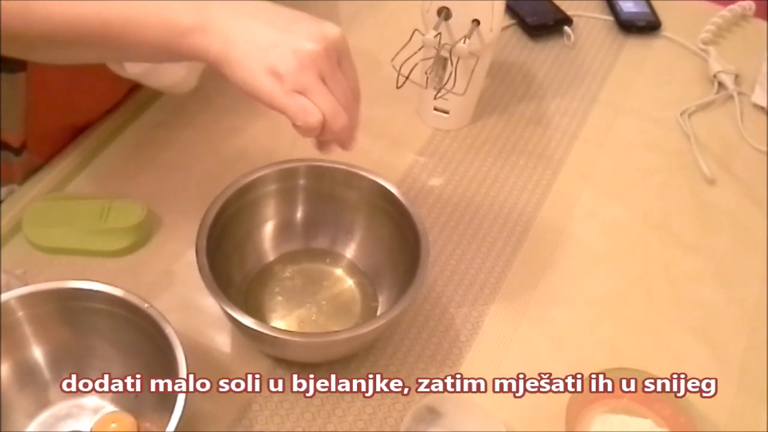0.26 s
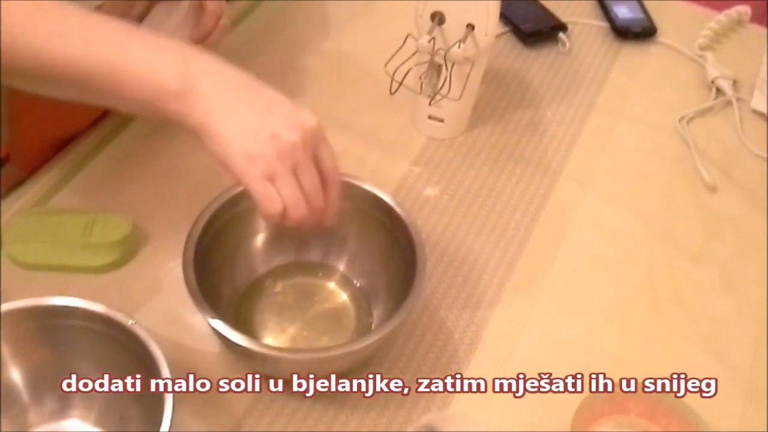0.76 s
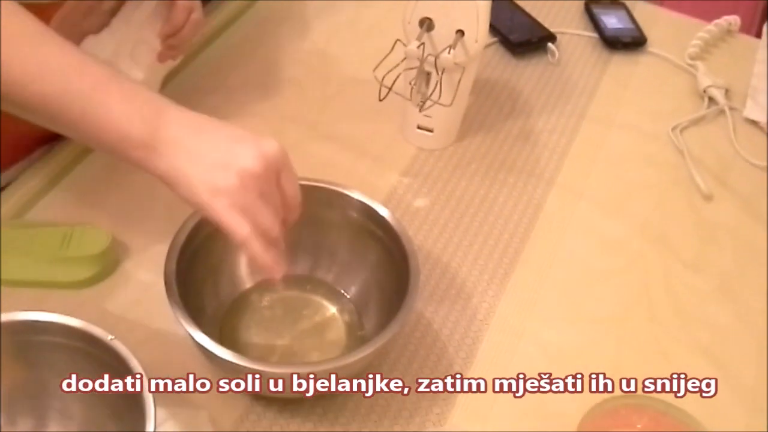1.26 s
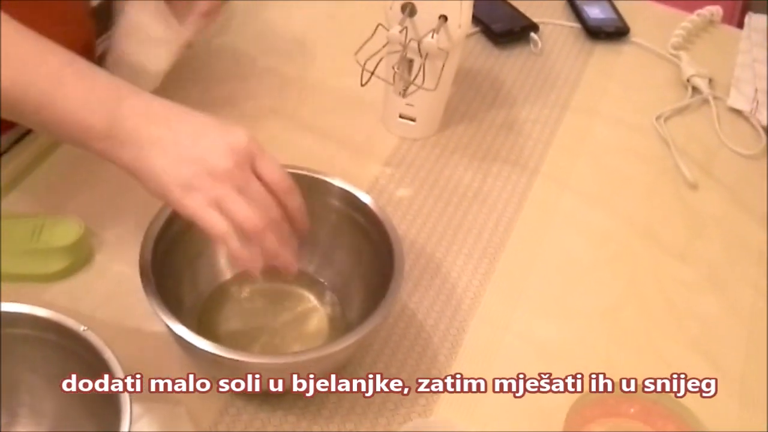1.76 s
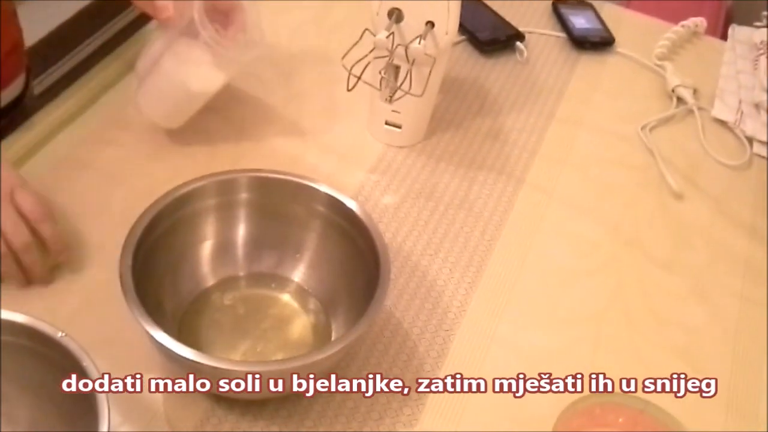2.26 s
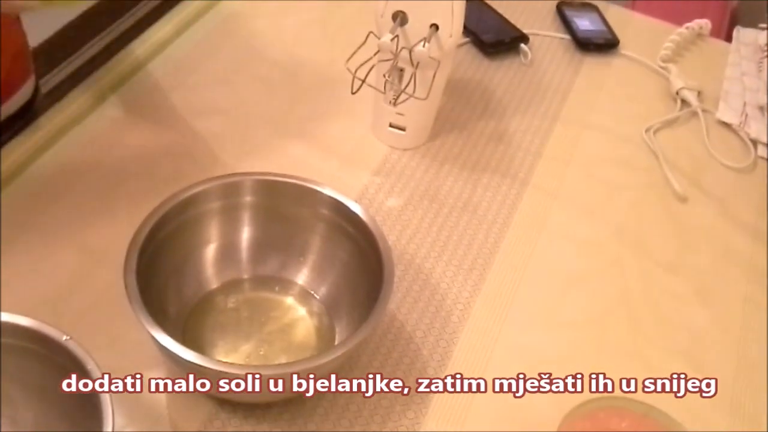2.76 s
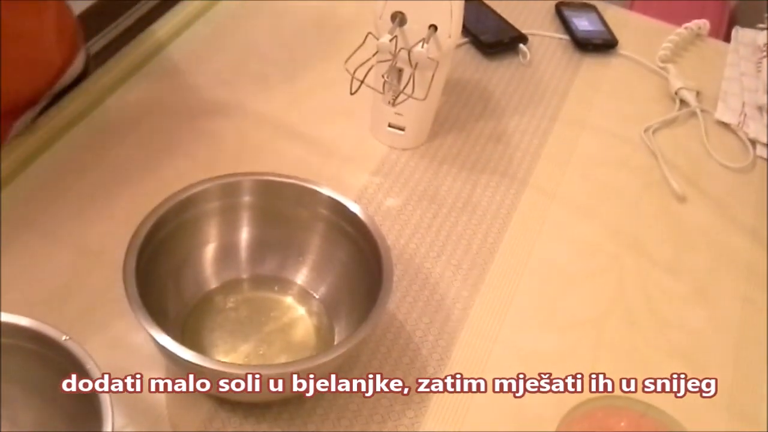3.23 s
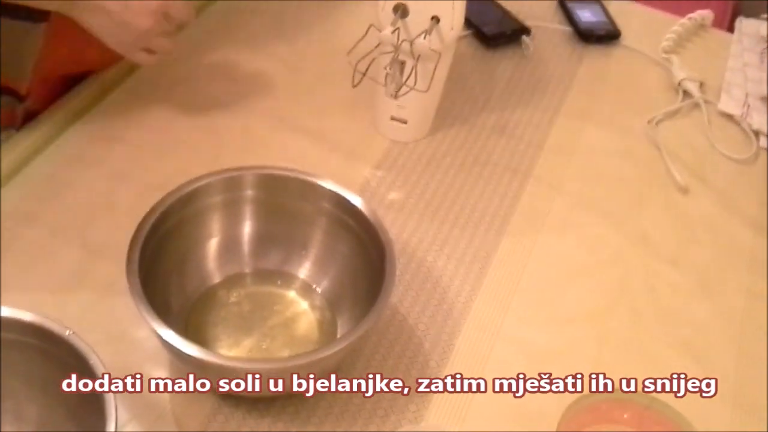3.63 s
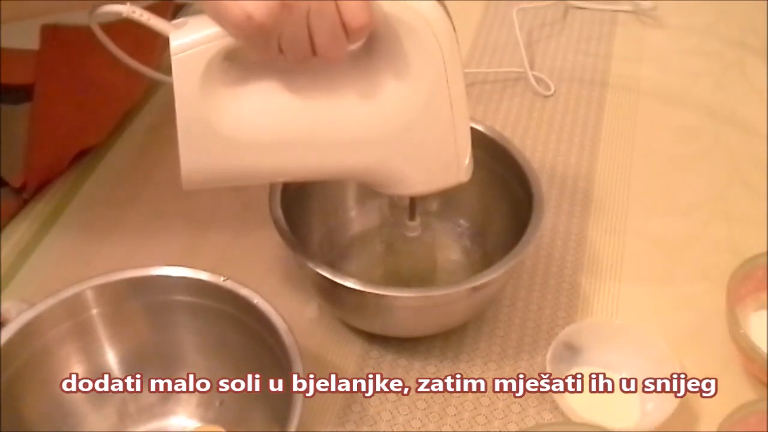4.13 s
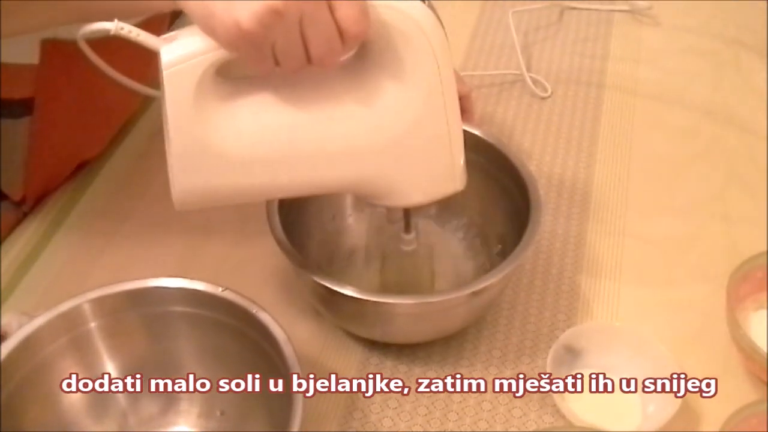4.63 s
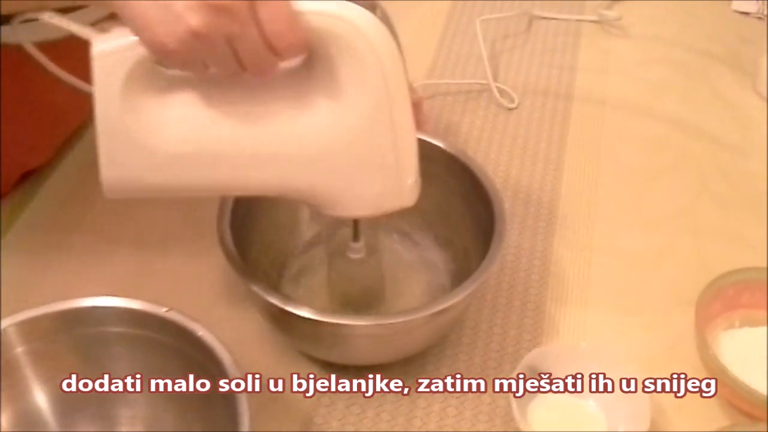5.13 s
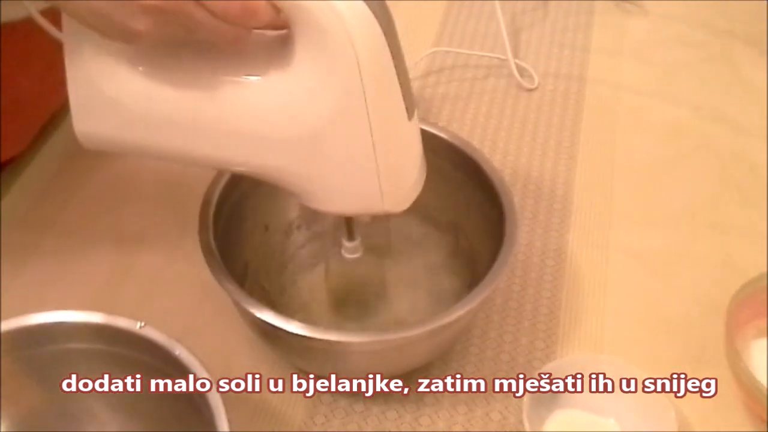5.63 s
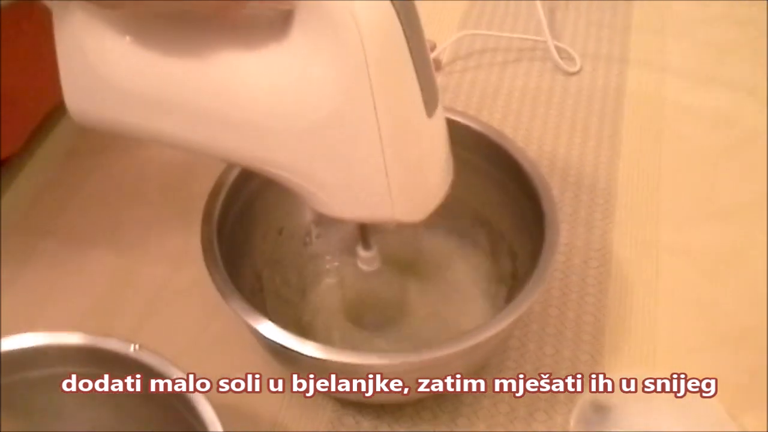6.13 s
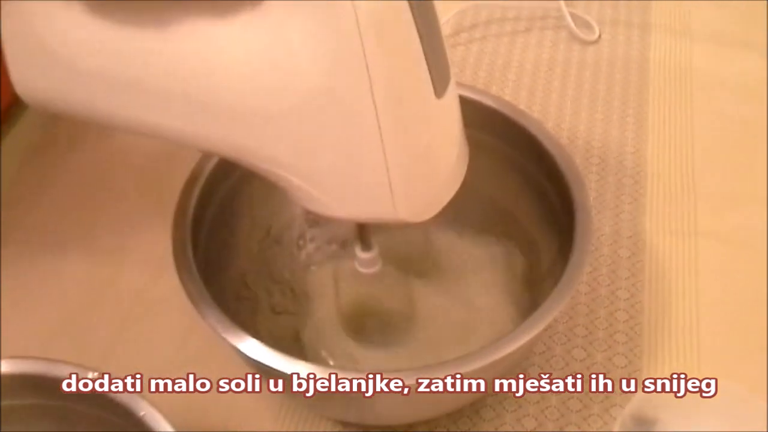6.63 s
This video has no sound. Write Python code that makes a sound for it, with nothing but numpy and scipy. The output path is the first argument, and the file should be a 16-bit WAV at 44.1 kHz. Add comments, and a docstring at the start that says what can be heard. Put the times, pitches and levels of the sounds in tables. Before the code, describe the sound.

Close plastic creaks from a hand gripping the microphone sit mostly on the left, over a faint dish clink and a soft rustle of salt between fingers. A wooden drawer slides shut with a few knocks, followed by a dull tap on the microphone. Suddenly a hand mixer is whirring in a metal bowl, loud at first, then lower. It clicks up a speed and whines higher, in a small home kitchen.

```python
"""A small kitchen, close up, on a hand-held camera; its left microphone port is covered, so that side is
dull and picks up the grip. Fingers rub salt into egg whites and a dish clinks while the camera's casing
creaks. A drawer rolls on its runners and knocks shut, and a finger taps the covered port. Then a running
hand mixer cuts in abruptly, whisking in a steel bowl, loud until the camera's automatic gain turns it
down. Its motor throbs with the mains until the switch clicks up and it spins to a higher speed."""
import sys
import numpy as np
from scipy import signal
from scipy.fft import rfft, irfft, next_fast_len
from scipy.io import wavfile
from scipy.ndimage import uniform_filter1d, map_coordinates

SR = 44100
rng = np.random.default_rng(int(sys.argv[2]) if len(sys.argv) > 2 else 0)


def int16_out(signal):
    """Quantize to a 16-bit WAV file."""
    q = np.round(np.clip(np.atleast_2d(signal).T, -1, 1) * 32767)
    wavfile.write(sys.argv[1], SR, q.astype(np.int16))


N = 303408
T = np.arange(N) / SR

# Levels in the tables are relative: each source trims its own.
# left port against right: freq_hz, left_minus_right_db
PORT_COVER = [(60, -6), (110, 13), (200, 3.5), (380, -1.5), (690, 0), (1270, 2.5), (2350, -5.5),
              (4320, -21.5), (7960, -35), (14700, -38)]
# how alike the two sides are: freq_hz, likeness (0 to 1)
STEREO_LIKENESS = [(60, 0.62), (130, 1), (300, 0.65), (630, 1), (1400, 0.022), (4000, 0.099), (10000, .1)]
# the kitchen's reverberation: freq_hz, t60_s
KITCHEN_DECAY = [(200, 0.75), (600, 0.42), (2000, 0.36), (6000, 0.64), (12000, 0.9)]
# room noise and microphone hiss: freq_hz, level_db
ROOM_TONE_SPECTRUM = [(30, -4), (60, -12), (130, -1), (250, -0.5), (500, -0.5), (1000, -2.5), (2000, -8.5),
                      (4500, -12), (7000, -9), (9000, -13), (15000, -16)]

# light high ticks from the fingertips: start_s, level_db
FINGER_FLICKS = [(0.159, -70), (0.191, -60)]
# one such tick: freq_hz, level_db
FLICK_SPECTRUM = [(3000, -27.5), (5200, -14), (5900, -3), (7500, -2), (8800, -10), (14000, -25)]
# strokes of fingers and sleeve: start_s, rise_s, level_db
HAND_STROKES = [(0.28, 0.024, -69), (0.5, 0.024, -68.5), (0.74, 0.022, -64), (0.955, 0.035, -58),
                (1.178, 0.023, -53.5), (2.018, 0.036, -51.5), (2.286, 0.05, -54.5), (2.44, 0.037, -63.5),
                (3.378, 0.038, -48)]
# soft brushing of the sleeve: freq_hz, level_db
SLEEVE_SPECTRUM = [(100, -4), (300, -3.5), (750, -2), (1400, -4.5), (2500, -7.5), (5000, -27)]
# pinches of salt: start_s, level_db
SALT_PINCHES = [(1.04, -58.5), (1.335, -72), (1.66, -63.5), (1.825, -84)]
# grains rubbing: freq_hz, level_db
SALT_SPECTRUM = [(1500, -23), (2700, -2.5), (4500, -2), (6500, 0), (8500, -1), (10500, -4.5), (14500, -9.5)]

# the casing slips under the fingers: start_s, level_db
CASING_SLIPS = [(0.398, -55), (0.483, -56), (0.521, -50), (0.541, -58), (0.663, -52), (0.695, -53.5),
                (0.732, -54), (0.846, -47), (0.87, -45), (0.907, -44.5), (0.981, -41.5), (1.01, -35.5),
                (1.05, -41), (1.061, -41), (1.087, -42), (1.097, -39), (1.134, -31.5), (1.167, -36.5),
                (1.188, -28), (1.343, -35), (1.352, -29), (1.4, -26), (1.451, -25), (1.469, -34),
                (1.507, -34), (1.534, -21), (1.5697, -32), (1.5859, -21.5), (1.643, -34.5), (1.682, -39),
                (1.728, -20), (1.748, -35.5), (1.7752, -22), (1.795, -37), (1.835, -44), (1.904, -25),
                (1.9712, -23.5), (1.993, -42), (2.044, -25.5)]
# the body of a slip: freq_hz, level_db
SLIP_SPECTRUM = [(35, -56), (60, -38), (150, -9), (215, -5), (298, 3.5), (600, 4), (880, 2), (1200, -10.5),
                 (1400, -3), (1700, -12.5), (2050, -3.5), (2500, -16), (3100, -43), (3900, -55),
                 (6600, -120)]
# the treble tick of a hard slip: freq_hz, level_db
TICK_SPECTRUM = [(1000, -39), (2200, -6), (2600, -11.5), (3100, -18), (3800, -12), (4750, -18),
                 (5800, -18.5), (7300, -21), (8600, -19.5), (10500, -26), (14000, -29)]
# the dish's ring: pitch_hz, level_db, t60_s
DISH_MODES = [(2770, 7, 0.14), (2890, -7, 0.18), (3460, 9, 0.047), (3370, -3, 0.35), (4160, 6, 0.13),
              (4400, 12, 0.043), (4700, 3, 0.1), (5800, 9, 0.06)]
# the scuff of touching it: freq_hz, level_db
SCUFF_SPECTRUM = [(1500, -28), (2800, -3), (3700, -7), (4400, -3), (5500, -11), (10000, -20)]

# the drawer's rumble as it travels: time_s, level_db
ROLL_LEVEL = [(2.72, -40), (2.762, -49), (2.782, -48.5), (2.844, -46), (2.926, -55.5), (2.96, -49.5),
              (3.03, -56.5)]
# its runners: freq_hz, level_db
RUNNER_SPECTRUM = [(47, -63), (80, -36), (231, -8.5), (379, -12), (432, 2.5), (481, -10), (524, -1.5),
                   (680, -15.5), (1090, -12.5), (1330, -21.5), (1880, -16), (2230, -28.5), (6570, -29),
                   (14000, -50)]
# drawer and contents knock: start_s, thud_db, clatter_db, bass_lift_db, crack_db, spot_hz, ring_db
DRAWER_KNOCKS = [(2.757, -49, -67, -5, -60, 430, -62), (2.827, -36, -65, -9, -52, 520, -64),
                 (2.946, -49, -58, 14, -58, 300, -50), (3.039, -28, -47, 3, -46, 980, -44),
                 (3.05, -22.5, -37, 1, -50, 900, -44), (3.0672, -18.5, -40.5, 8, -28.5, 1360, -33),
                 (3.081, -23.5, -60, -7, -41, 490, -41), (3.1841, -20, -44, 0.5, -26, 734, -38)]
# wood meets wood: freq_hz, level_db
CRACK_SPECTRUM = [(400, -36), (1000, 6.5), (2200, -10), (3500, -4), (8000, -22.5), (14000, -33)]
# the dull blow of a knock: freq_hz, level_db
THUD_SPECTRUM = [(41, -68), (70, -48), (130, -24), (190, -7), (228, -12), (282, -12), (370, -8), (465, -5),
                 (540, -3), (714, -9), (933, -8), (1400, -9), (1900, -7), (5000, -29.5), (6500, -50),
                 (11000, -120)]
# small hard contacts: freq_hz, level_db
CLATTER_SPECTRUM = [(1200, -25), (3000, -2), (6500, 12), (9000, 0), (14000, -9.5)]
# the drawer's wooden box: pitch_hz, level_db, t60_s
BOX_MODES = [(190, -10, 0.25), (234, -2, 0.6), (350, -8, .3), (427, 1, 0.27), (521, 2, .27),
             (581, -3, 0.33), (670, -9, .3), (846, -9, .28), (1260, -8, .3), (1383, -7, .3), (1798, -8, .3)]

# a finger on the covered port: freq_hz, level_db
TAP_SPECTRUM = [(24, -68), (40, -48), (147, -0.5), (377, 4), (692, -10), (819, -5), (1820, -21.5),
                (2540, -31.5), (6000, -58), (7800, -89), (13200, -120)]
# the low shuffle of the grip shifting: freq_hz, level_db
SHUFFLE_SPECTRUM = [(40, -25), (90, -3), (160, 10), (240, -15), (500, -35), (2000, -80)]

# the motor shaft's hum: time_s, level_db
SHAFT_HUM_LEVEL = [(3.76, -51.5), (3.92, -63), (4.45, -67), (4.84, -61), (4.92, -50), (5.09, -57),
                   (5.27, -51.5), (5.4, -54), (5.54, -48), (6.0, -51.5), (6.88, -52)]
# the fan's tone, swelling and fading as the mixer is moved: time_s, level_db
FAN_TONE_LEVEL = [(3.72, -62), (3.83, -50), (3.95, -63), (4.25, -58), (4.7, -60), (4.86, -46.5),
                  (4.97, -48), (5.1, -57), (5.22, -49.5), (5.55, -56), (5.88, -60), (5.97, -46.5),
                  (6.27, -47.5), (6.45, -50), (6.55, -61), (6.66, -46.5), (6.88, -44)]
# the commutator's whine: time_s, level_db
COMMUTATOR_LEVEL = [(3.72, -44), (3.9, -50), (4.25, -54), (4.42, -62), (4.8, -64), (5.1, -58), (5.6, -61),
                    (6.0, -56), (6.88, -56)]
# the piercing whistle two octaves above it: time_s, level_db
HIGH_WHISTLE_LEVEL = [(3.72, -58), (4.35, -60), (4.5, -67), (4.7, -73)]
# steadier lines (shaft overtones, a fan sideband, whine overtones): cycles_per_turn
STEADY_ORDERS = [2, 3, 4, 5, 11, 24, 36]
# the level of each: low_speed_db, high_speed_db
STEADY_LEVELS = [(-61, -64), (-62, -56), (-58, -62), (-61, -56.5), (-70, -56), (-53, -55.5), (-69, -75)]
# resonances of bowl and housing: centre_hz, width_hz, lift_db
BOWL_RESONANCES = [(520, 36, -2.5), (1235, 170, -1), (1450, 62, 0.5), (1876, 320, 8), (2420, 110, 4),
                   (2650, 150, 4), (3390, 210, 4.5), (4000, 320, 2.5), (4640, 41, 2)]
# mixer noise at low speed: freq_hz, level_db
LOW_SPEED_SPECTRUM = [(47, -29), (80, -25.5), (205, -9.5), (244, 1.5), (285, -10), (335, 2.5), (400, -5.5),
                      (503, 6), (600, -3), (1240, 0), (1640, -6), (2900, -4), (3500, -12), (5980, -6),
                      (9200, -15), (11300, -26), (12500, -26), (15000, -57)]
# mixer noise at high speed: freq_hz, level_db
HIGH_SPEED_SPECTRUM = [(47, -71), (80, -28), (160, -35), (267, -18.5), (340, -7), (413, -6.5), (833, -7.5),
                       (1240, -11.5), (1870, -17.5), (2900, -11.5), (3940, -8), (4910, -11), (6200, -8.5),
                       (7300, -10), (9270, -19.5), (13700, -26), (15000, -59)]
# bands that swell as the beaters wander round the bowl: peak_s, half_length_s, centre_hz, width_hz, lift_db
PASSING_RESONANCES = [(3.78, 0.12, 2900, 200, 4), (4.1, 0.35, 1250, 60, 4), (4.1, 0.3, 2730, 70, 4),
                      (4.42, 0.07, 2580, 110, 7), (4.7, 0.06, 3030, 140, 5), (4.92, 0.3, 2715, 70, 5),
                      (4.95, 0.2, 4000, 90, 3), (5.2, 0.4, 1820, 130, 3), (5.35, 0.09, 3770, 110, 7),
                      (5.43, 0.14, 1115, 50, 8), (5.75, 0.13, 3960, 110, 5), (6.4, 0.45, 4095, 60, 6)]
# detents of the speed switch: start_s, level_db
SWITCH_CLICKS = [(4.36, -35), (4.4014, -34.5), (4.4952, -34)]

TOP_HZ = 15000  # the camera's band limit
HUM_END_S, CUT_IN_S, SHIFT_S = 3.54, 3.718, 4.497  # hum stops; running mixer cuts in; it is switched up
FAN_BLADES, COMMUTATOR_BARS = 10, 12
TURNS_PER_BEAT = 5.6  # shaft turns for each pass of a beater wire through the liquid


def amp(db):
    """Decibels to gain."""
    return 10 ** (np.asarray(db) / 20)


def unit(x):
    """x at rms 1."""
    return x / np.sqrt(np.mean(x ** 2) + 1e-20)


def along(points, hz):
    """(freq_hz, value) points read on a log axis."""
    freqs, values = np.transpose(points)
    return np.interp(np.log(hz + 1), np.log(freqs + 1), values)


def curve(points):
    """(time_s, value) points read at every sample."""
    return np.interp(T, *np.transpose(points))


def between(ends, share):
    """The value a share of the way from one end to the other."""
    return ends[0] + (ends[1] - ends[0]) * share


def wobble(rate):
    """A smooth random curve, rate knots a second."""
    return map_coordinates(rng.standard_normal(int(N * rate / SR) + 4), [T * rate])


def fade(t60):
    """One second of exponential decay."""
    return amp(-60 * T[:SR] / t60)


def swell(rise_s):
    """One second of a stroke: it peaks after rise_s and dies away."""
    age = T[:SR] / rise_s
    return (age * np.exp(1 - age)) ** 2


def add(track, start_s, sound):
    """Mix a sound into the track."""
    part = track[..., round(start_s * SR):][..., :sound.shape[-1]]
    part += sound[..., :part.shape[-1]]


def filtered(x, response):
    """x times a response of frequency."""
    n = x.shape[-1]
    padded = next_fast_len(n + 8192)
    return irfft(rfft(x, padded) * response(np.fft.rfftfreq(padded, 1 / SR)), padded)[..., :n]


def below(hz, edge_hz, order):
    """A low-pass response, one half at the edge."""
    return 1 / (1 + (hz / edge_hz) ** order)


def peak(hz, centre_hz, width_hz):
    """A resonance of height 1; the width is taken at half height."""
    return 1 / (1 + (2 * (hz - centre_hz) / width_hz) ** 2)


def coloured(x, spectrum):
    """x shaped by a spectrum, at rms 1."""
    return unit(filtered(x, lambda hz: amp(along(spectrum, hz))))


def spread(pair):
    """Two unrelated signals become a left and a right that are partly alike."""
    turn = lambda hz: np.arccos(np.clip(along(STEREO_LIKENESS, hz), 0, 1)) / 2
    mid, side = filtered(pair, lambda hz: np.array([np.cos(turn(hz)), np.sin(turn(hz))]))
    return np.array([mid + side, mid - side])


def rush(spectrum, size=N):
    """Stereo noise of rms 1."""
    return coloured(spread(rng.standard_normal((2, size))), spectrum)


def blow(spectrum, t60, attack_s=0.0029):
    """A burst of noise that swells as the contact closes, then dies."""
    return (1 - fade(attack_s)) * fade(t60) * rush(spectrum, size=SR)


def ring(modes, attack_s):
    """One second of modes, levelled against the strongest and struck a little differently each time."""
    top_db = max(db for _, db, _ in modes)
    partials = [amp(db - top_db + rng.normal(0, 0.67)) * fade(t60) * np.sin(2 * np.pi * hz * T[:SR])
                for hz, db, t60 in modes]
    return (1 - fade(attack_s)) * sum(partials)


def room_tone():
    """Faint hiss, mains hum and a thin whine; just before the mixer the tones stop and the hiss drops."""
    hum = amp(-81.5) * np.sin(2 * np.pi * 100 * T)
    whine = amp(-81) * wobble(120) * np.sin(2 * np.pi * 2650 * T)
    hiss = amp(-66.5 - 5 * (T > HUM_END_S)) * coloured(rng.standard_normal((2, N)), ROOM_TONE_SPECTRUM)
    return hiss + (hum + whine) * (T < HUM_END_S)


def grit(centre_hz, width_hz, lift):
    """Salty fingers rub: a grainy friction hiss with one broad resonance."""
    rub = filtered(rush(SALT_SPECTRUM), lambda hz: 1 + lift * peak(hz, centre_hz, width_hz))
    return unit(rub) * amp(0.78 * wobble(160))


def hands(rub_from_s=0.89, rub_to_s=2.16):
    """Fingers flick, a sleeve brushes past, a dish is touched and fingertips grind pinches of salt."""
    strokes, pinches = np.zeros(N), np.zeros(N)
    for start_s, rise_s, db in HAND_STROKES:
        add(strokes, start_s, amp(db) * swell(rise_s))
    for start_s, db in SALT_PINCHES:
        add(pinches, start_s, amp(db) * swell(rise_s=0.044))
    # the fingers rustle on between the pinches, growing louder
    rubbing = uniform_filter1d(1.0 * (T > rub_from_s) * (T < rub_to_s), size=SR // 10)
    rustle_db = -69.5 + 9.5 * (np.minimum(T, rub_to_s) - rub_from_s) + 4.8 * wobble(39.14)
    brushing = amp(-4.5) * grit(6530, width_hz=2200, lift=1.0) + amp(-5) * rush(SLEEVE_SPECTRUM)
    grinding = amp(-0.5) * grit(8500, width_hz=1700, lift=8.2) + amp(-1) * rush(SLEEVE_SPECTRUM)
    sound = np.hypot(strokes, rubbing * amp(rustle_db)) * brushing + pinches * grinding
    add(sound, start_s=0.623, sound=dish_clink())
    for start_s, db in FINGER_FLICKS:
        add(sound, start_s, amp(db) * blow(FLICK_SPECTRUM, t60=0.24))
    return amp(0.04) * sound + amp(-16.5) * kitchen(sound)


def bending_click(spectrum, delay_ms, edge_hz=TOP_HZ, uneven=False):
    """A click of peak 1 through a plastic shell: bending waves bring treble first, 1 kHz after delay_ms."""
    hz = np.fft.rfftfreq(4096, 1 / SR)
    lag = 4 * np.pi * delay_ms * np.sqrt(hz / 1000)
    # each spot of the shell has a slightly different colour
    ripple_db = 1.3 * uneven * map_coordinates(rng.standard_normal(64), [np.sqrt(hz) / 4])
    gain = amp(along(spectrum, hz) + ripple_db) * below(hz, edge_hz, 4)
    click = irfft(gain * np.exp(-1j * lag))[:SR // 20]
    return click / np.abs(click).max()


def casing_creaks(travel_s=0.0023, rim_echo_s=0.00358, hard_from_db=-31.5):
    """Each slip sends a low push through the shell, echoed by its rim; hard ones snap with a tick."""
    push, tick = np.zeros(N), np.zeros(N)
    for start_s, db in CASING_SLIPS:
        hard = (1 + np.tanh((db - hard_from_db) / 2)) / 2
        tick_db = -22 + 1.13 * (db + 21)
        delay_ms = between((1.1, 2.3), hard) * np.exp(0.052 * rng.standard_normal())
        edge_hz = 5000 * amp(0.27 * db)  # a harder slip is a brighter one
        slip = amp(db + 4.5) * bending_click(SLIP_SPECTRUM, delay_ms, edge_hz, uneven=True)
        echo = amp(between((-6, -17.5), hard)) * filtered(slip, lambda hz: below(hz, 1100, 4))
        arrival_s = start_s + travel_s
        add(push, arrival_s, slip)
        add(push, arrival_s + rim_echo_s, echo)
        add(tick, arrival_s, hard * amp(tick_db) * bending_click(TICK_SPECTRUM, delay_ms, uneven=True))
    return push, tick


def grip(tap_s=3.6026, shuffle_s=3.925):
    """Handling noise: creaks, a tap and a shuffle; their low push lands almost wholly on the left."""
    push, tick = casing_creaks()
    # a tap squeezes the air in the covered port: one dull, heavily damped swing
    add(push, tap_s, -amp(-13) * bending_click(TAP_SPECTRUM, delay_ms=0.63))
    add(push, shuffle_s, amp(-50.5) * swell(rise_s=0.046) * rush(SHUFFLE_SPECTRUM, size=SR)[0])
    push = filtered(push, lambda hz: (1j * hz / (1j * hz + 45)) ** 2)  # slow pressure leaks out
    left = push + filtered(tick, lambda hz: below(hz, 6000, 2))
    # on its way to the far port the tick bounces around inside the shell
    shell = unit(rng.standard_normal(SR) * fade(0.005)) / np.sqrt(SR)
    far_tick = filtered(signal.fftconvolve(tick, shell)[:N], lambda hz: 1 - below(hz, 3500, 2))
    return np.array([left, amp(-50) * push + amp(-1) * far_tick])


def dish_clink():
    """A touched dish rings over the scuff of the contact."""
    return amp(-59) * ring(DISH_MODES, attack_s=0.0084) + amp(-62.5) * blow(SCUFF_SPECTRUM, t60=0.22)


def drawer_roll():
    """The drawer rumbles unevenly on its runners."""
    moving = curve([(2.745, 0), (2.76, 1), (3.04, 1), (3.1, 0)])
    return moving * amp(curve(ROLL_LEVEL) + 2.5 + 0.52 * wobble(100)) * rush(RUNNER_SPECTRUM)


def drawer_knocks(spot_lift_db=10.5, spot_octaves=0.42):
    """The drawer knocks against its stop; its box rings and its contents clatter."""
    hits, box = np.zeros((2, N)), np.zeros(N)
    for start_s, thud_db, clatter_db, bass_lift_db, crack_db, spot_hz, ring_db in DRAWER_KNOCKS:
        bass = lambda hz: bass_lift_db * below(hz, 300, 4)
        # the struck spot lifts a band around its pitch
        spot = lambda hz: spot_lift_db * np.exp(-(np.log2(hz / spot_hz) / spot_octaves) ** 2)
        thud = [(hz, db + bass(hz) + spot(hz)) for hz, db in THUD_SPECTRUM]
        modes = [(hz, db + bass(hz), t60) for hz, db, t60 in BOX_MODES]
        add(hits, start_s, amp(crack_db) * blow(CRACK_SPECTRUM, t60=0.0097))
        add(hits, start_s, amp(thud_db + 2) * blow(thud, t60=0.041, attack_s=0.019))
        add(hits, start_s, amp(clatter_db + 0.5) * blow(CLATTER_SPECTRUM, t60=0.077, attack_s=0.023))
        add(box, start_s, amp(ring_db) * ring(modes, attack_s=0.0092))
    return box + amp(1.5) * (hits + kitchen(hits))


def shaft_speed(first_hz=242.4, low_hz=267.6, high_hz=391.7):
    """Turns a second: a slow creep on the low setting, then a quick spin-up that ends in another creep."""
    low_creep_s, spin_up_s, high_creep_s, creep_share = 0.78, 0.375, 1.25, 0.24
    low = low_hz + (first_hz - low_hz) * np.exp(-np.maximum(T - CUT_IN_S, 0) / low_creep_s)
    since = np.maximum(T - SHIFT_S, 0)
    to_go = (1 - creep_share) * np.exp(-since / spin_up_s) + creep_share * np.exp(-since / high_creep_s)
    return high_hz + (low - high_hz) * to_go


def motor(turns, high, surge, gain_db, drag_rad=0.022):
    """Shaft, fan and commutator lines; they throb with the mains, and reflections shake them a little."""
    # each pass of a beater wire holds the shaft back
    angle = 2 * np.pi * turns + drag_rad * np.sin(2 * np.pi * turns / TURNS_PER_BEAT)
    lines = [(1, curve(SHAFT_HUM_LEVEL)), (FAN_BLADES, curve(FAN_TONE_LEVEL)),
             (COMMUTATOR_BARS, curve(COMMUTATOR_LEVEL)), (4 * COMMUTATOR_BARS, curve(HIGH_WHISTLE_LEVEL))]
    for order, levels in zip(STEADY_ORDERS, STEADY_LEVELS):
        lines.append((order, between(levels, np.sqrt(high)) + 0.35 * gain_db))
    tones = np.zeros((2, N))
    for order, level_db in lines:
        throb_db = (5 if order == COMMUTATOR_BARS else 1.5) * surge
        scatter = 0.09 * np.cbrt(order) * np.array([wobble(35) + 1j * wobble(35) for _ in range(2)])
        tone = np.real((1 + scatter) * np.exp(1j * (order * angle + 2 * np.pi * rng.random())))
        tones += amp(level_db + throb_db + wobble(9)) * tone
    return tones


def sloshing(x, depth_db=1.45):
    """The moving liquid keeps retuning the bowl: peaks and dips come and go across the spectrum."""
    frames = signal.stft(x, nperseg=1024)[2]
    ripple = uniform_filter1d(rng.standard_normal(frames.shape[1:]), size=4, axis=0)
    ripple = uniform_filter1d(ripple, size=14, axis=1)
    return signal.istft(frames * amp(depth_db * unit(ripple)), nperseg=1024)[1][:, :N]


def bowl_noise(high, drops_per_s=700):
    """Noise and droplets flicked at the steel, coloured by bowl, housing and motor speed."""
    drops = (rng.random((2, N)) < drops_per_s / SR) * rng.standard_normal((2, N))
    noise = spread(rng.standard_normal((2, N)) + 0.38 * unit(drops))
    # echoes between bowl, counter and walls carve fine peaks and dips into it
    echoes = unit(rng.standard_normal(SR) * fade(0.25)) / np.sqrt(SR)
    noise += 0.5 * signal.fftconvolve(noise, echoes[None], axes=1)[:, :N]
    bowl = lambda hz: amp(sum(db * peak(hz, centre, width) for centre, width, db in BOWL_RESONANCES))
    noise = filtered(noise, bowl)
    fast_share = high ** 1.1
    slow = np.sqrt(1 - fast_share) * coloured(noise, LOW_SPEED_SPECTRUM)
    fast = np.sqrt(fast_share) * coloured(noise, HIGH_SPEED_SPECTRUM)
    noise = sloshing(slow + fast)
    for peak_s, half_length_s, centre_hz, width_hz, lift_db in PASSING_RESONANCES:
        band = filtered(noise, lambda hz: peak(hz, centre_hz, width_hz))
        noise += (amp(lift_db) - 1) * np.exp(-((T - peak_s) / half_length_s) ** 2) * band
    return noise


def steady(x):
    """Stereo x held near rms 1 over each third of a second."""
    power = uniform_filter1d(np.mean(x ** 2, axis=0), size=SR // 3)
    return x / np.sqrt(np.abs(power) + 1e-12)


def whisking(turns, high, surge, gain_db):
    """Churned egg white in the low band, gear rattle in the middle, cooling air on top."""
    noise = bowl_noise(high)
    churn = filtered(noise, lambda hz: below(hz, 1010, 8))
    air = filtered(noise, lambda hz: 1 - below(hz, 2200, 8))
    gears = noise - churn - air
    beat = np.cos(2 * np.pi * turns / TURNS_PER_BEAT)  # beater wires pass through the liquid
    scrape = np.cos(2 * np.pi * turns)  # brushes and worm gear scrape once a turn
    churn_db = between((-53.5, -50.5), high) + 0.64 * beat + 0.29 * wobble(25)
    gear_db = between((-48, -50), high) + 0.85 * beat + 0.77 * scrape + 0.46 * surge
    air_db = between((-46, -40.5), high ** 1.7) + 0.46 * scrape + 0.2 * surge + 0.51 * wobble(40)
    sound = amp(churn_db) * steady(churn) + amp(gear_db) * steady(gears) + amp(air_db) * steady(air)
    return amp(gain_db) * sound


def mixer(gain_fall_s=0.17, mains_hz=50):
    """The running mixer cuts in abruptly, loud until the camera's automatic gain turns it down."""
    speed = shaft_speed()
    at_shift = np.interp(SHIFT_S, T, speed)
    high = np.clip((speed - at_shift) / (speed[-1] - at_shift), 0, 1)  # 0 at low speed, 1 at the end
    gain_db = 8 * np.exp(-np.maximum(T - CUT_IN_S, 0) / gain_fall_s)  # the gain's fall, as a set curve
    # at low speed the motor gets only every other mains half-wave, so its torque throbs
    half_wave = np.maximum(np.sin(2 * np.pi * mains_hz * T), 0)
    surge = unit(half_wave - half_wave.mean()) * (T < SHIFT_S)
    flutter = 0.003 * surge + 0.0007 * wobble(140) + 0.0007 * wobble(14)
    turns = np.cumsum(speed * (1 + flutter)) / SR
    sound = motor(turns, high, surge, gain_db) + whisking(turns, high, surge, gain_db) + speed_switch()
    return sound * np.clip((T - CUT_IN_S) / 0.004, 0, 1)


def speed_switch(slide_s=4.34):
    """The switch scrapes along its slot and clicks through its detents."""
    sound = np.zeros((2, N))
    for start_s, db in SWITCH_CLICKS:
        add(sound, start_s, amp(db - 2.5) * blow(CLATTER_SPECTRUM, t60=0.05))
    add(sound, slide_s, amp(-50) * swell(rise_s=0.07) * rush(CLATTER_SPECTRUM, size=SR))
    return sound


def kitchen(x):
    """The room's tail: each frequency dies at its own speed."""
    hz, t, frames = signal.stft(rng.standard_normal((2, SR)), SR, nperseg=256)
    decay = amp(-60 * t / along(KITCHEN_DECAY, hz)[:, None])
    tail = spread(signal.istft(frames * decay, SR, nperseg=256)[1])
    return signal.fftconvolve(x, tail / np.linalg.norm(tail[0]), axes=1)[:, :N]


def ports(hz, lag_ms=0.28, low_cut_hz=85):
    """The microphone's response to airborne sound: the covered left port is dull and slightly late."""
    cover_db = along(PORT_COVER, hz)
    left, right = 2 / (1 + amp([-cover_db, cover_db]))
    late = np.exp(-2j * np.pi * hz * lag_ms / 1000)
    return np.array([left * late, right]) * (1 - below(hz, low_cut_hz, 2))


def scene():
    """Kitchen sounds reach the microphone through its ports, handling noise through the casing."""
    airborne = hands() + drawer_roll() + drawer_knocks() + mixer()
    return filtered(airborne, ports) + grip() + room_tone()


def record(dry):
    """The camera keeps nothing above its band limit."""
    return filtered(dry, lambda hz: hz < TOP_HZ)


dry = scene()
out = record(dry)
int16_out(out)
```